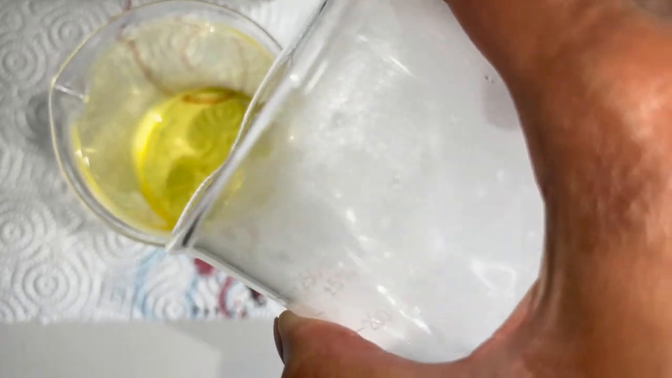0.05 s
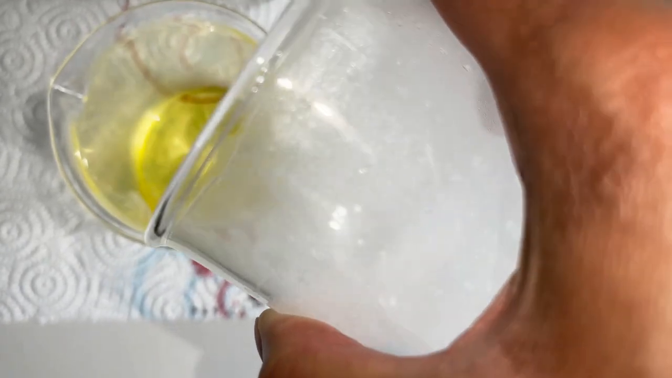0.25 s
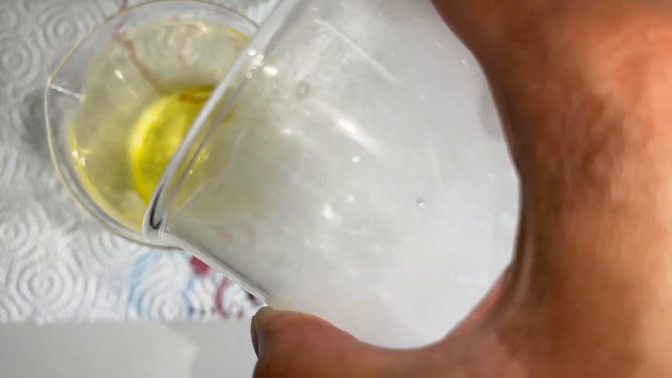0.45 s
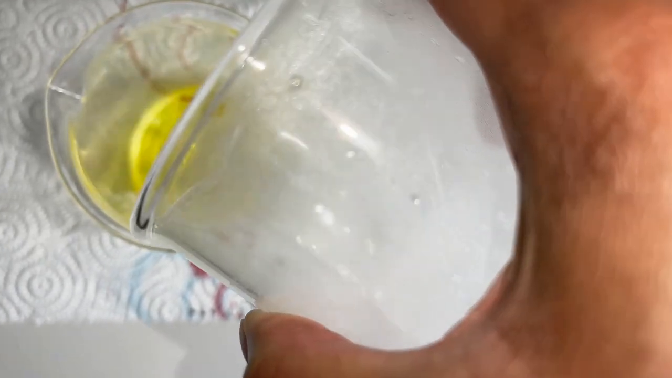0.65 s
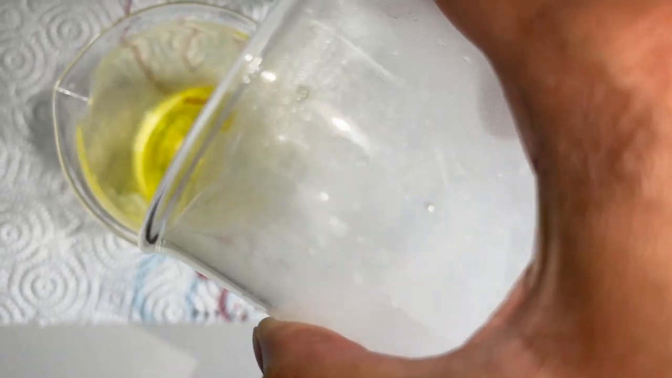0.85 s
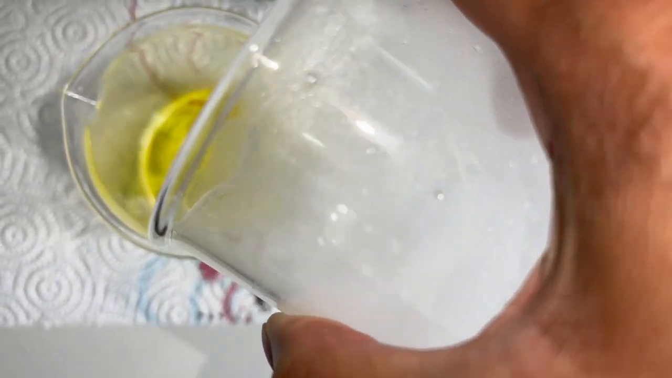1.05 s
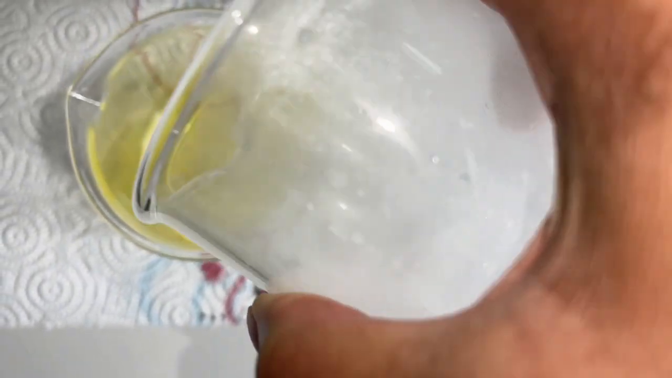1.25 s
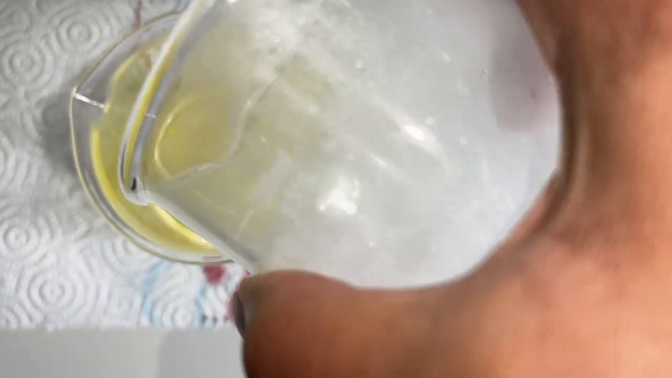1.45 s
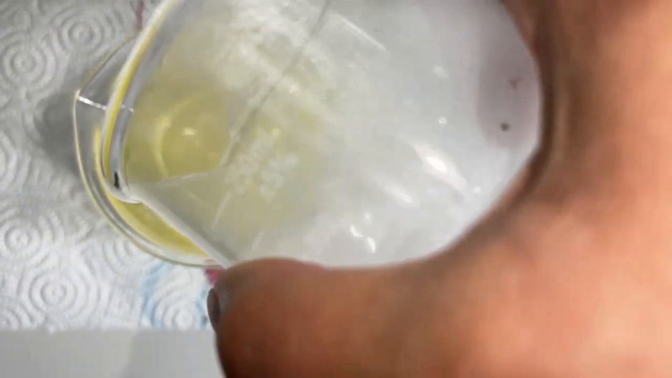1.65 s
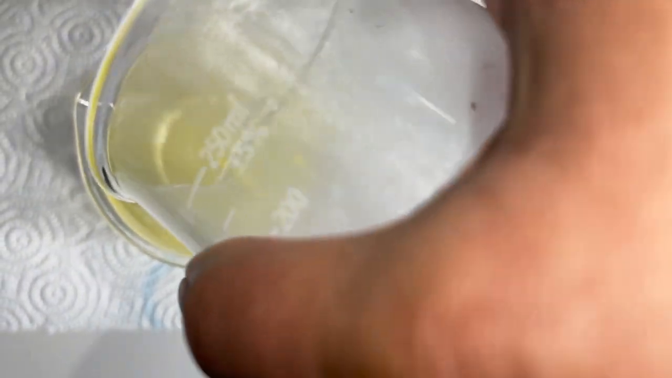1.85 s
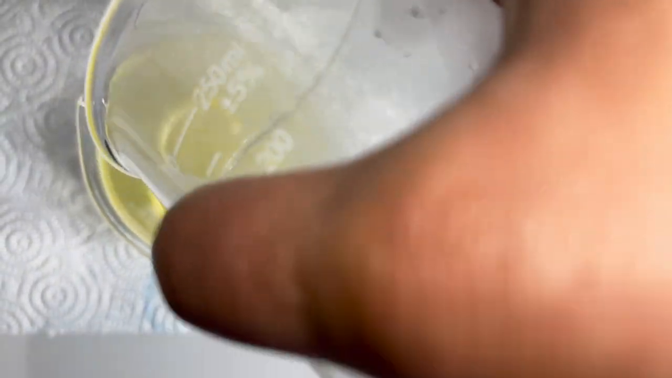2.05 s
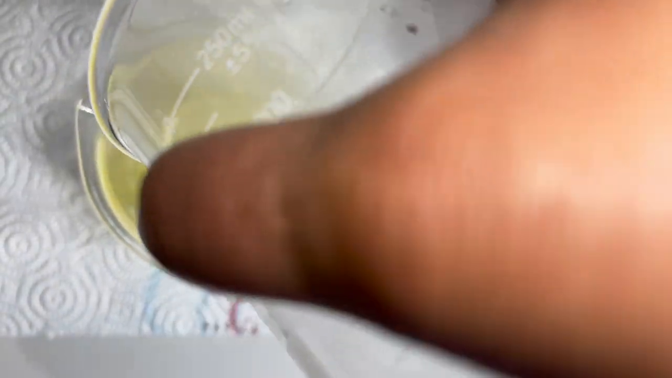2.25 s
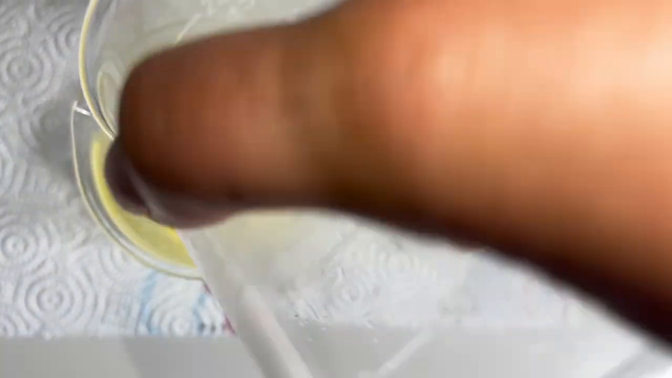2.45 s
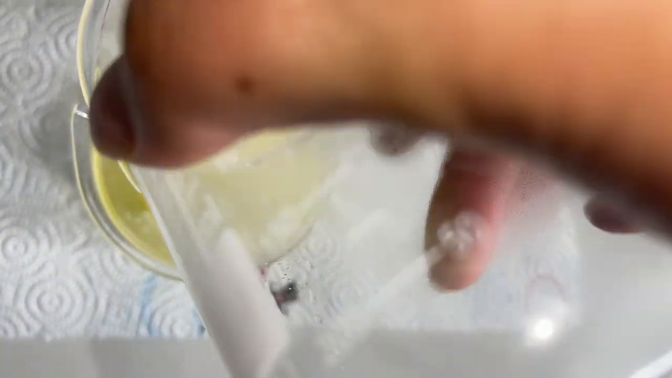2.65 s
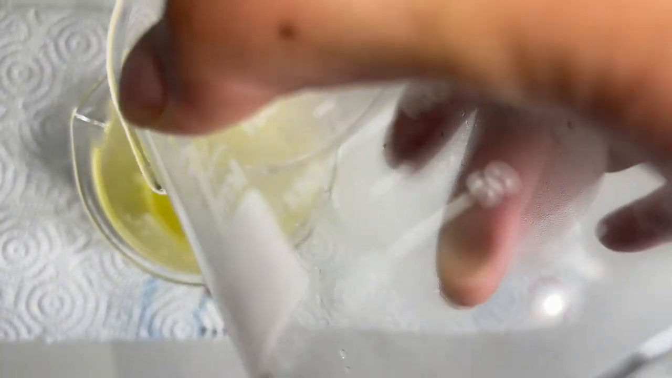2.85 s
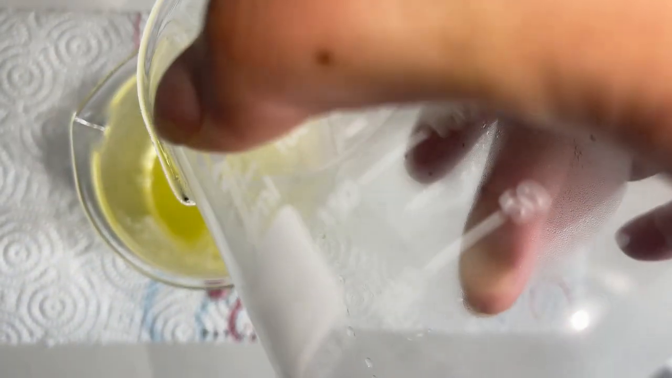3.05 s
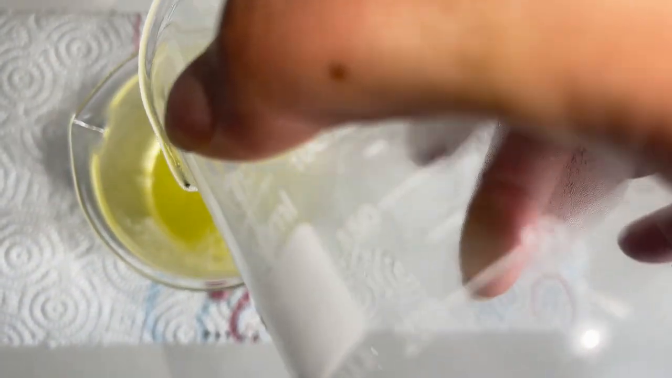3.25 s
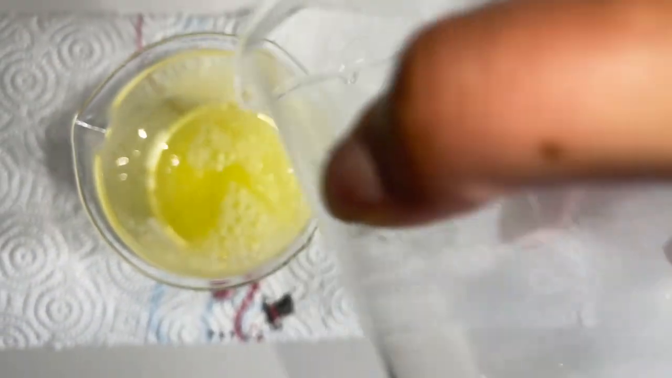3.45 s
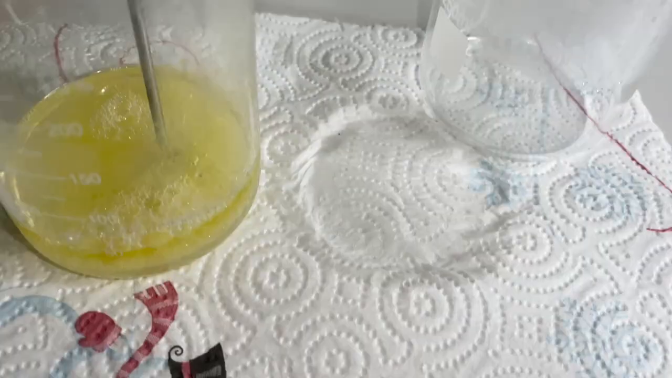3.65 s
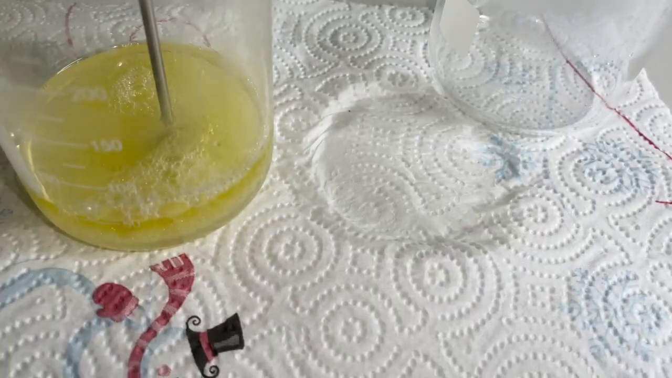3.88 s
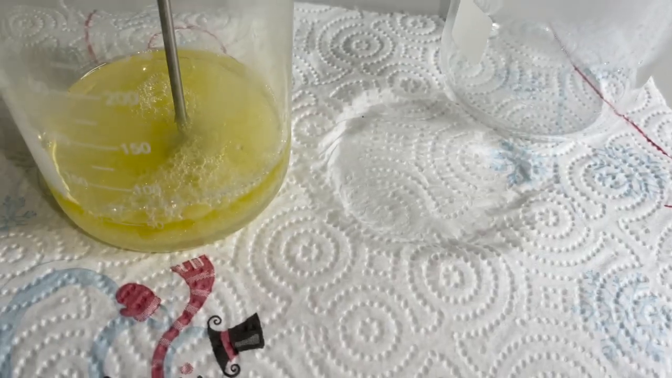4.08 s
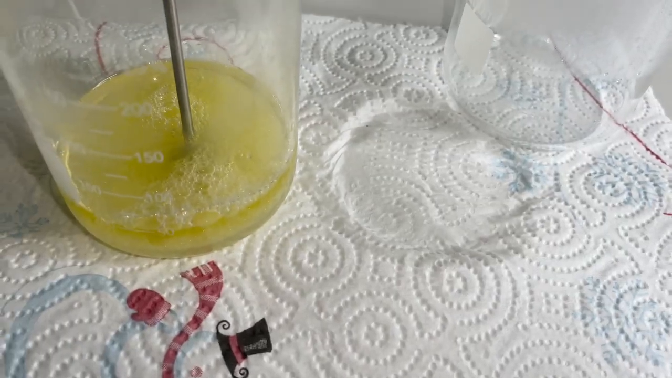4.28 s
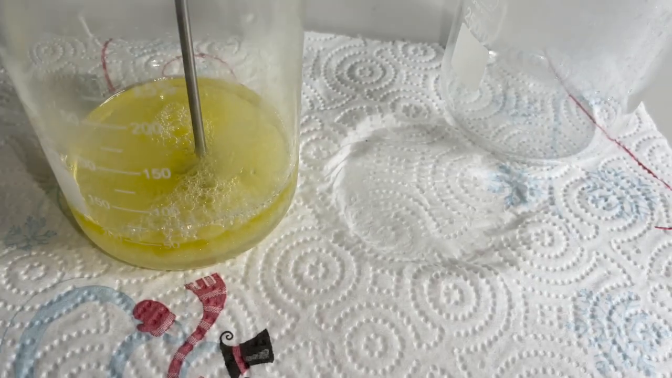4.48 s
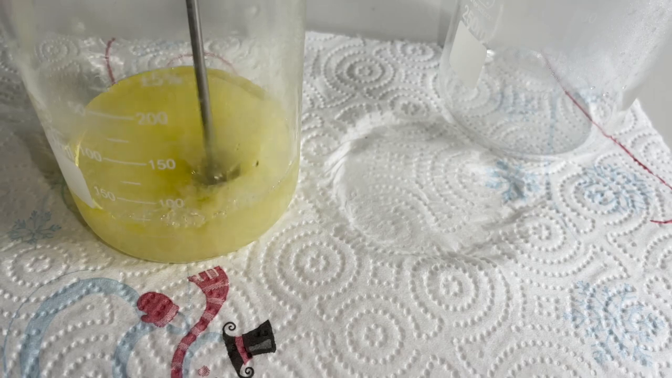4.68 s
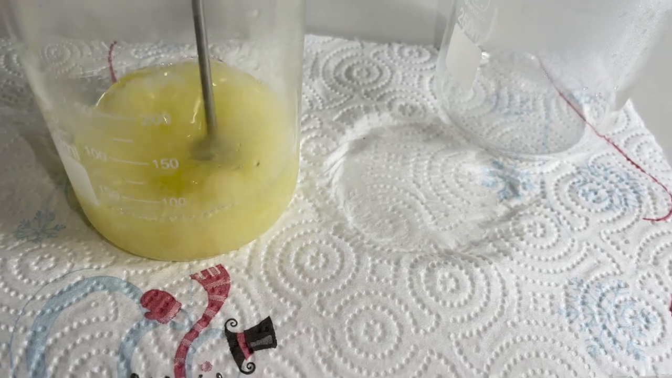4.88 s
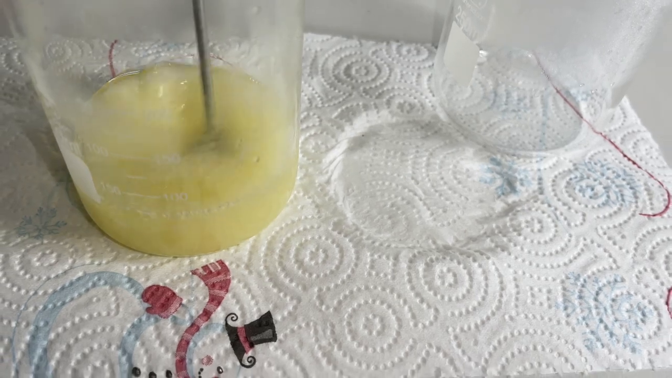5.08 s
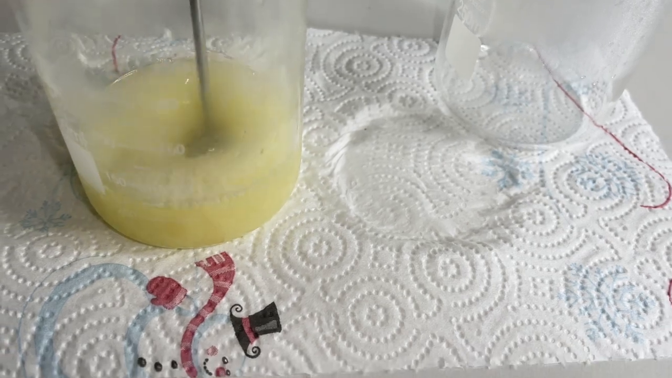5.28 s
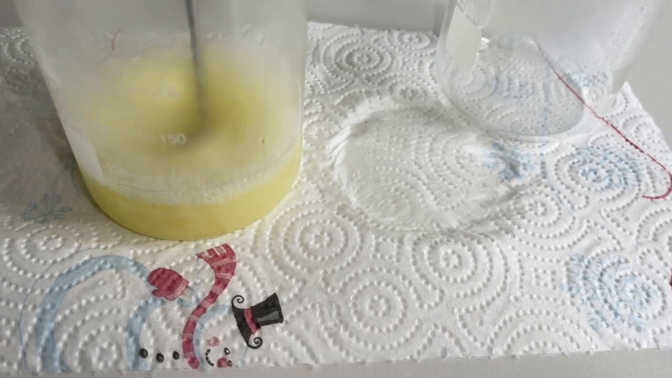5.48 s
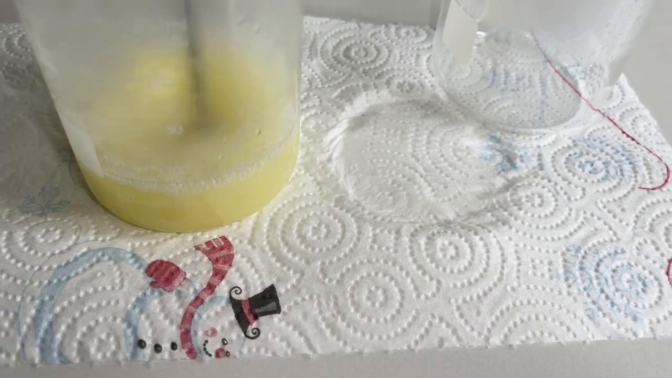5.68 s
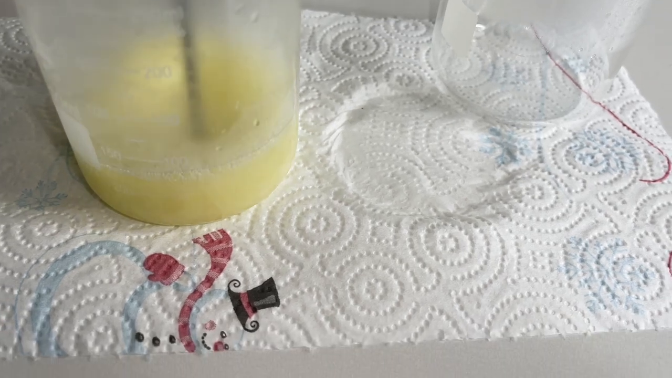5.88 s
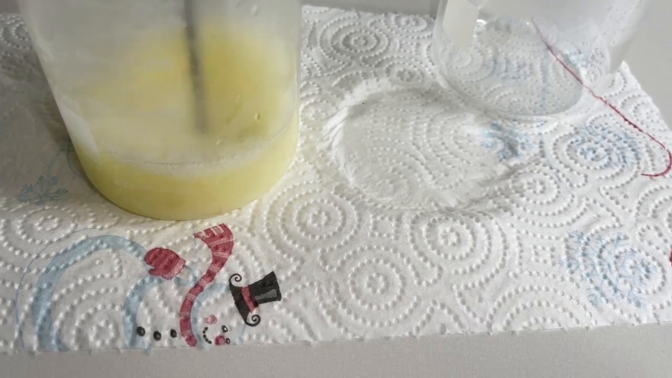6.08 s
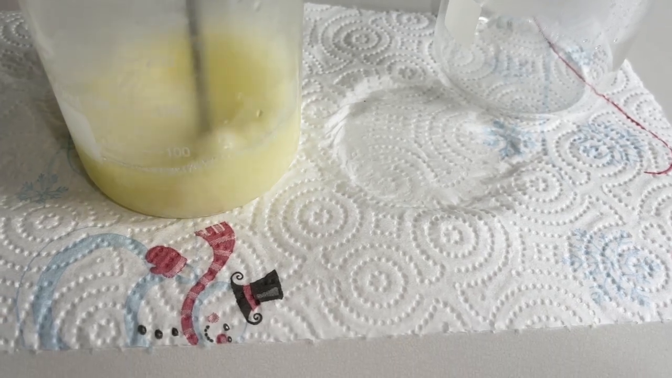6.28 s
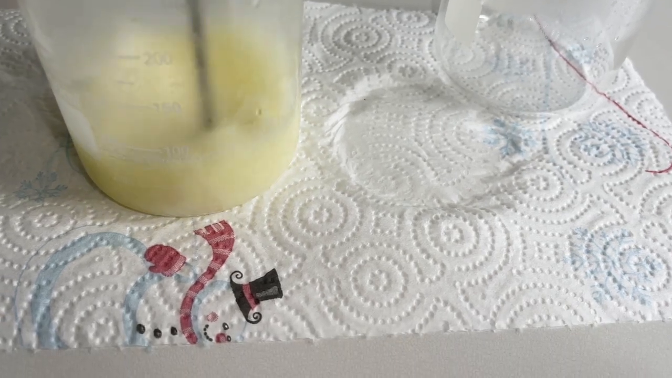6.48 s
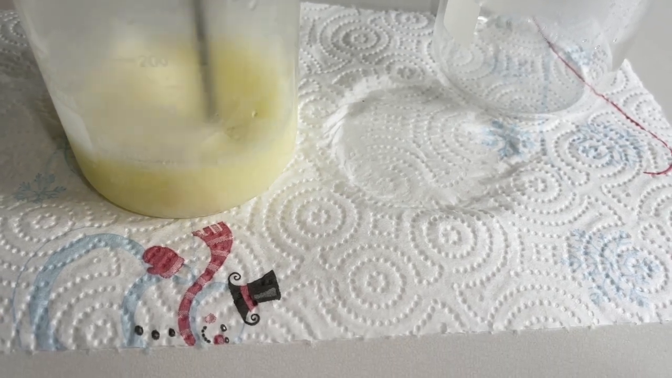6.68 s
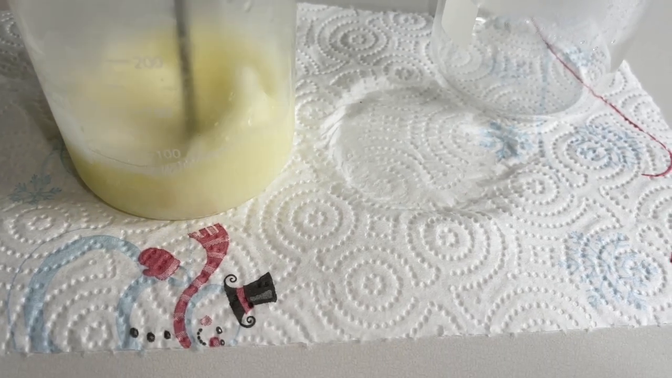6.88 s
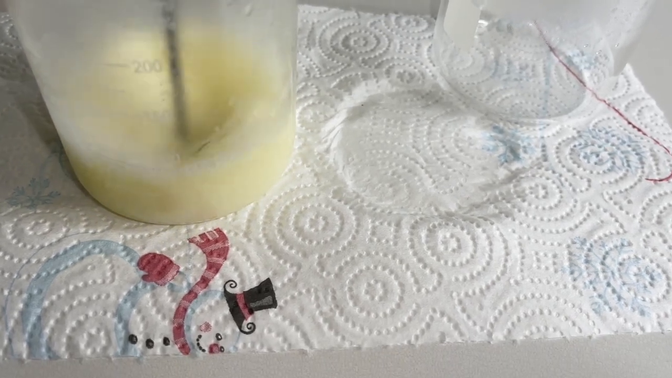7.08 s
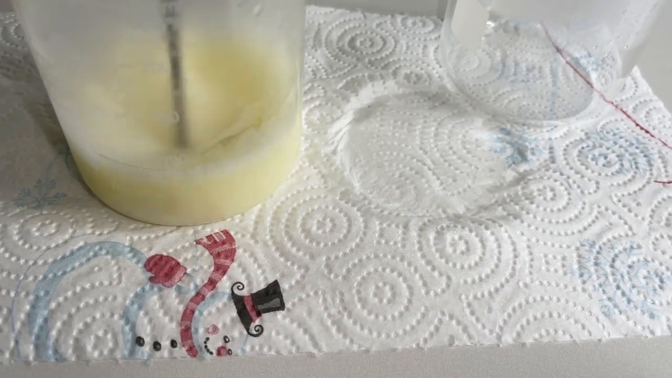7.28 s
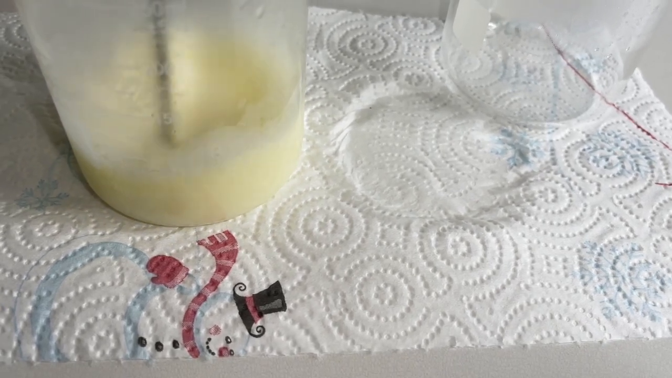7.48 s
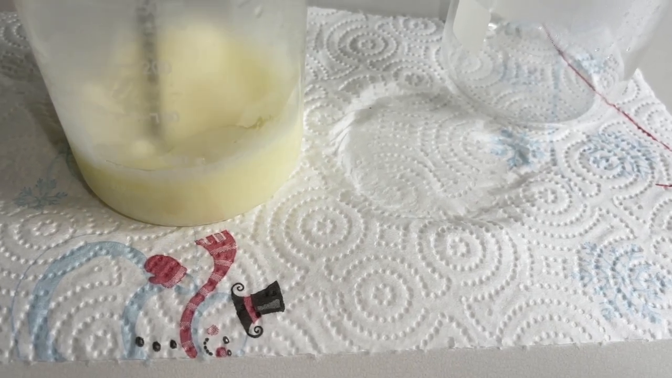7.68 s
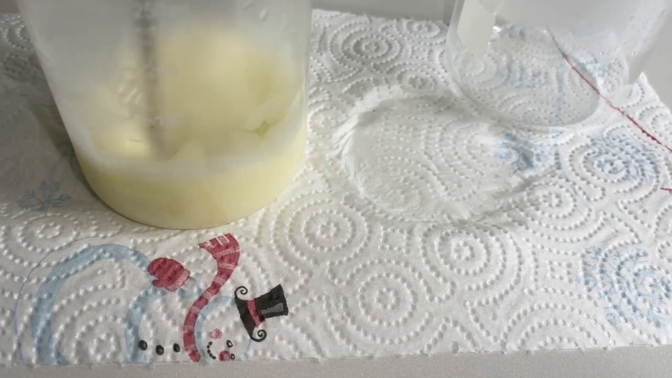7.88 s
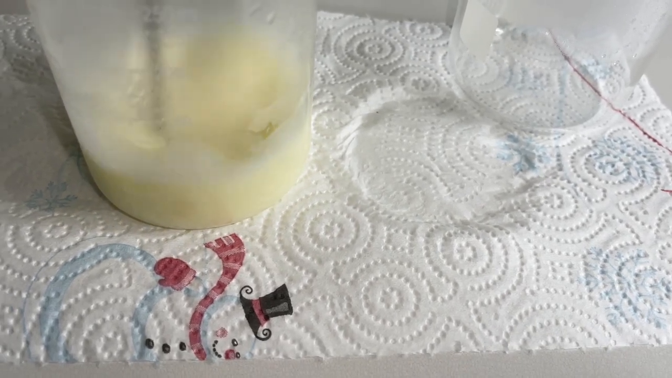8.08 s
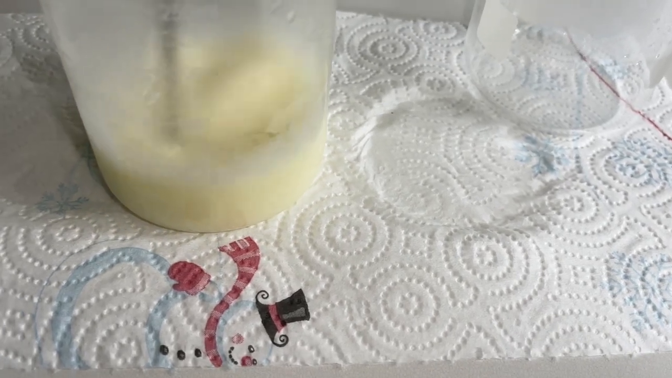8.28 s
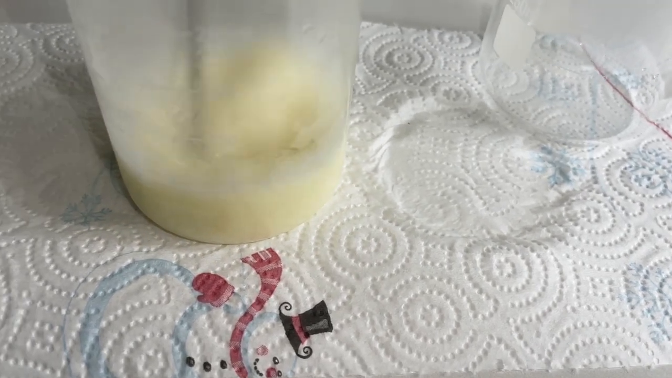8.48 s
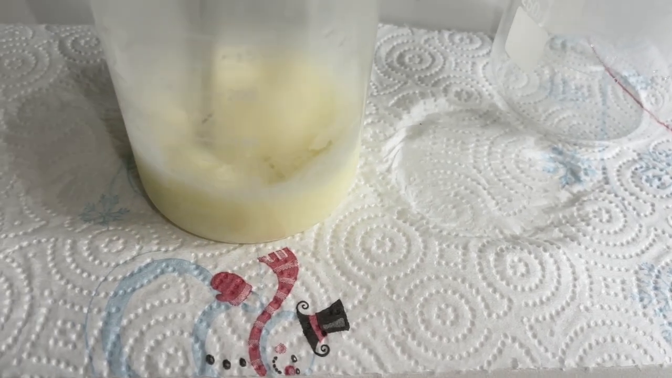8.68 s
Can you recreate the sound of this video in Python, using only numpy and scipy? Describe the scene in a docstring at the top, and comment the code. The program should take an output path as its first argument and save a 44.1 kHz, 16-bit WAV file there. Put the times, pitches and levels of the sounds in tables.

```python
"""On a table top, close to two microphone ports, liquid is poured from one beaker into another: drops crackle
and bubbles glug as decaying tones, over grains of splash ringing in the glass. The rims clink as the pour ends.
Soft low bumps and a few taps (sines, noise bursts) follow; then a small handheld mixer starts. Its unbalanced
shaft hums in harmonics, knocks and rubs on every turn; the blade churns the thickening liquid and twice clatters
against the beaker, whose damped modes ring. Low rumble and faint room air lie under it all."""
import sys
import numpy as np
from scipy import signal
from scipy.fft import rfft, irfft
from scipy.io import wavfile
from scipy.ndimage import map_coordinates

SR = 44100
rng = np.random.default_rng(int(sys.argv[2]) if len(sys.argv) > 2 else 0)


def to_wav(s):
    """Save 16-bit WAV."""
    ch = np.atleast_2d(s).T  # columns
    pcm = np.round(np.clip(ch, -1, 1) * 32767)  # PCM
    wavfile.write(sys.argv[1], SR, pcm.astype(np.int16))


N = 385434
TIME = np.arange(N) / SR

# the blade hits the beaker: (time [s], level [dB], brightness [Hz])
BLADE_HITS = [(6.6141, -11, 4980), (6.6197, -14, 4010), (6.6262, -13.5, 2500), (6.633, -10, 7020),
              (6.6373, -9.5, 7000), (6.661, -15, 3020), (7.2369, -11.5, 9000), (7.2383, -5.5, 4500),
              (7.255, -15, 2000), (7.2613, -8.5, 4500), (7.2751, -14.5, 900), (7.2855, -14.5, 800)]
MOTOR_ON_S, LOADED_S, KNOCKS_FROM_S, MOTOR_ATTACK_S = 4.617, 4.66, 4.8, 0.017
POUR_START_S = .49
RUB_FOLLOWS = 0.33   # dB more rubbing per dB of harder knocking


def from_db(db):
    """Decibels to gain."""
    return 10 ** (np.asarray(db) / 20)


def rms_one(x):
    """Scale to unit rms."""
    return x / np.sqrt(np.mean(x ** 2) + 1e-20)


def in_time(rows):
    """The second column of a curve, read at every sample."""
    s, value = np.transpose(rows)
    return np.interp(TIME, s, value)


def during(start, end, attack_s, release_s):
    """A gate that opens, holds and closes along straight ramps."""
    return np.clip(np.minimum((TIME - start) / attack_s, (end - TIME) / release_s), 0, 1)


def rise(start, attack_s):
    """A ramp from 0 to 1 that stays open."""
    return np.clip((TIME - start) / attack_s, 0, 1)


def swell(s, length_s, db):
    """A smooth rise and fall around a moment, in dB."""
    return db * np.exp(-np.minimum(((TIME - s) / length_s) ** 2, 20))


def fading(s, db, fade_db_per_s, attack_s):
    """An envelope that sets in at a level and fades evenly in dB; a negative fade grows."""
    return rise(s, attack_s) * from_db(db - np.minimum(fade_db_per_s * np.maximum(TIME - s, 0), 200))


def drift(rate):
    """Smooth chance with spread about 1, a new value rate times a second."""
    knots = rng.standard_normal(N // 20)
    return 1.2 * np.interp(TIME * rate, np.arange(len(knots)), knots)


def per_bin(points):
    """A table over log frequency, read at every FFT bin."""
    hz, value = np.transpose(points)
    bin_hz = np.arange(N // 2 + 1) * SR / N
    return np.interp(np.log(bin_hz + 1), np.log(hz), value)


def coloured(x, spectrum):
    """Give a signal a spectrum; rms 1."""
    return rms_one(irfft(rfft(x) * from_db(per_bin(spectrum)), N))


def lowpass(x, hz, order=2):
    """Butterworth low-pass."""
    return signal.sosfilt(signal.butter(order, min(hz, .45 * SR), fs=SR, output="sos"), x)


def resonate(x, hz, width):
    """A two-pole resonance with gain 1 on top."""
    r = np.exp(-np.pi * width / SR)
    poles = [1, -2 * r * np.cos(2 * np.pi * hz / SR), r * r]
    return signal.lfilter(np.array([1, 0, -1]) * (1 - r * r) / 2, poles, x + 1e-18)


def gliding(x, hz, width):
    """A resonance whose centre moves; gain 1 on top."""
    r, spin = np.exp(-np.pi * width / SR), np.exp(2j * np.pi * np.cumsum(hz) / SR)
    return 2 * np.real(spin * signal.lfilter([1 - r], [1, -r], x * np.conj(spin)))


def add(out, s, sound):
    """Mix a sound in at a time."""
    at = int(s * SR)
    out[at:at + len(sound)] += sound[:N - at]


def room(x, early_db, tail_db):
    """Table and walls: a few quick reflections and a dull tail, different at each port."""
    t60_s = 0.27
    t = TIME[:SR // 2]
    early = rng.standard_normal((2, len(t))) * (rng.random((2, len(t))) < .03)
    early = early * np.exp(-t / 0.0093) * (t > .001)
    tail = lowpass(rng.standard_normal((2, len(t))), 5600, order=1) * from_db(-60 * t / t60_s) * (t > .006)
    echoes = (from_db(early_db) * rms_one(early) + from_db(tail_db) * rms_one(tail)) / np.sqrt(len(t))
    return signal.fftconvolve(x[None], echoes, axes=1)[:, :N]


def at_ports(x, pan):
    """A near source reaches the two ports with unequal level and phase; their mean is the source."""
    # phase between the ports: (frequency [Hz], left ahead of right [rad])
    left_lead = [(100, 0.31), (800, 0.009), (3500, -0.89), (11000, -1.67), (14500, -.8)]
    ratio = from_db(per_bin(pan)) * np.exp(1j * np.clip(per_bin(left_lead), -2, 2))
    return irfft(rfft(x) * 2 * np.array([ratio, np.ones_like(ratio)]) / (1 + ratio), N)


def ringing(s, db, modes):
    """Glass struck once: its modes die away, each at its own rate."""
    age = np.maximum(TIME - s, 0)
    return sum(from_db(db + mode_db - 60 * np.minimum(age / t60, 2)) * np.sin(2 * np.pi * hz * age)
               for hz, t60, mode_db in modes)


def burst(s, db, decay_s, colour, bright_hz):
    """A short dying burst of noise with a given peak level."""
    age = np.maximum(TIME - s, 0)
    noise = rng.standard_normal(N) * (age > 0) * np.exp(-np.minimum(age / decay_s, 20))
    sound = lowpass(coloured(noise, colour), bright_hz)
    return from_db(db) * sound / np.abs(sound).max()


def grains(per_s, low_hz, high_hz, cycles, spread_db, count=16):
    """Random tiny bubbles, each ringing some cycles at one of a set of pitches; rms 1."""
    born = rng.random(N) < per_s / SR
    sizes = born * from_db(spread_db * np.minimum(rng.exponential(1, N), 3)) * rng.choice([-1, 1], N)
    dealt = rng.integers(0, count, N)
    pitches = np.geomspace(low_hz, high_hz, count)
    return rms_one(sum(rms_one(resonate(sizes * (dealt == k), hz, hz / cycles))
                       for k, hz in enumerate(pitches)))


def bubbles(rows, swell_cycles, glide, snap_db, snap_s):
    """A bubble pinches off with a snap, swells for a few cycles and dies away, rising in pitch."""
    out, t = np.zeros(N), TIME[:SR // 20]
    for s, db, hz in rows:
        age = hz * t / (swell_cycles * from_db(rng.normal(0, 1)))
        pitch_rise = 1 + glide * (np.tanh(age / 2) - .5)
        tone = age ** 2 * np.exp(2 - 2 * age) * np.sin(2 * np.pi * hz * t * pitch_rise)
        snap = lowpass(rng.standard_normal(len(t)) * np.exp(-t / snap_s), min(3 * hz, 11000), order=4)
        snap = snap - lowpass(snap, hz / 4, order=1)   # small bubbles carry little bass
        add(out, s, from_db(db) * (tone + from_db(snap_db) * snap))
    return out


def pour_flow():
    """The stream sets in quickly, runs evenly and thins out to nothing."""
    return during(POUR_START_S, 2.292, attack_s=0.12, release_s=0.23)


def background():
    """Low rumble from the hands and the pouring, and the faint air of the room."""
    # shifts of the grip start a rumble: (time [s], level [dB], fade [dB/s]); the first slowly grows
    grips = [(0, -66.5, -1), (2.56, -54, 25), (3.685, -62, 13), (4.66, -53, 2)]
    # low rumble: (frequency [Hz], level [dB])
    rumble_colour = [(18, -36), (58, 2.5), (105, -5), (170, -15), (270, -15), (430, -28.5), (900, -55.5)]
    # room air: (frequency [Hz], level [dB])
    air_colour = [(450, -3.5), (1000, -13.5), (2700, -10), (3800, -14.5), (4600, -23.5), (9000, -18.5),
                  (14000, -27.5)]
    still_db, pour_db, air_db = -75, -67, -74
    handling = sum(fading(*grip, attack_s=0.012) ** 2 for grip in grips)
    level = np.sqrt(from_db(still_db) ** 2 + (from_db(pour_db) * pour_flow()) ** 2 + handling)
    middle, side = [coloured(rng.standard_normal(N), rumble_colour) for _ in range(2)]
    air = np.array([coloured(rng.standard_normal(N), air_colour) for _ in range(2)])
    return level * (middle + .22 * side * np.array([[1], [-1]])) + from_db(air_db) * air


def bumps():
    """Soft low thumps of the handled beaker: dying sines with a softened start."""
    # bumps: (time [s], level [dB])
    bump_rows = [(2.58, -35), (3.679, -51.5)]
    hz, t60_s = 56.1, 0.37
    out = 0
    for s, db in bump_rows:
        age = np.maximum(TIME - s, 0)
        envelope = from_db(db - 60 * np.minimum(age / t60_s, 2)) * np.minimum(age * hz / 2, 1)
        out = out + envelope * np.sin(2 * np.pi * hz * age)
    return out


def taps():
    """Short knocks of handled things wake the room; the hardest sets a beaker ringing."""
    # light taps: (time [s], peak level [dB], brightness [Hz], room share [gain])
    tap_rows = [(3.7497, -34.5, 7000, 0.63), (3.7533, -34, 4500, 0.66), (4.148, -50.5, 2000, 0.06)]
    # noise of a tap: (frequency [Hz], level [dB])
    tap_colour = [(120, -28), (300, -22), (1000, -4.5), (1450, -8), (1800, -20.5), (3200, -11), (4500, -22),
                  (14000, -28)]
    # modes of the tapped beaker: (frequency [Hz], t60 [s], level [dB])
    tap_modes = [(415, 0.21, 1.5), (1100, 0.27, 0), (1420, .26, -6)]
    out = 0
    for s, db, bright_hz, wet in tap_rows:
        tap = burst(s, db, 0.0019, tap_colour, bright_hz)
        out = out + tap + wet * room(tap, early_db=6.0, tail_db=2)
    s, db = max(tap_rows, key=lambda row: row[1])[:2]
    return out + ringing(s, db - 18.5, tap_modes)


def clink():
    """As the pour ends the two rims touch: a thin tick and a faint long ring."""
    # noise of the tick: (frequency [Hz], level [dB])
    tick_colour = [(500, -19), (1200, -8), (1650, 1), (3200, -5), (5000, -16)]
    # modes of the glass rim: (frequency [Hz], t60 [s], level [dB])
    rim_modes = [(1351, .7, -15), (2062, .25, -7)]
    s, db, ring_db = 2.297, -32.5, -27
    sound = burst(s, db, 0.0012, tick_colour, 5300) + ringing(s, db + ring_db, rim_modes)
    return sound + room(sound, early_db=-3.0, tail_db=-16)


def in_beaker(x):
    """A splash heard directly and through the ringing air of the beaker."""
    # resonances of the air in the beaker: (frequency [Hz], level [dB])
    cavity = [(900, -2.5), (1310, 2), (1580, -2.5), (2220, -0.5), (2600, 2), (3370, -0.5), (4200, -3.5)]
    width_hz, direct_db = 130, -14.5
    ring = sum((-1) ** k * from_db(db) * resonate(x, hz, width_hz) for k, (hz, db) in enumerate(cavity))
    return from_db(direct_db) * lowpass(x, 4500) + ring


def slaps(rows, decay_s):
    """Short wet slaps inside the beaker, each with a given peak level."""
    out, t = np.zeros(N), TIME[:SR // 20]
    for s, db in rows:
        sound = in_beaker(rng.standard_normal(len(t)) * np.exp(-t / decay_s))
        add(out, s, from_db(db) * sound / np.abs(sound).max())
    return out


def patter(per_s, spread_db):
    """Random impacts of uneven size; rms 1."""
    born = rng.random(N) < per_s / SR
    return rms_one(born * from_db(spread_db * np.minimum(rng.exponential(1, N), 2)) * rng.choice([-1, 1], N))


def glugging(rows):
    """Big bubbles: the louder, the lower they ring, and the pitch climbs as the beaker fills."""
    mean_hz, rise_hz_per_s, fall_hz_per_db, scatter_hz = 831, 27, 5, 32.25
    usual_s, usual_db = np.mean(rows, axis=0)
    pitched = []
    for s, db in rows:
        hz = mean_hz + rise_hz_per_s * (s - usual_s) - fall_hz_per_db * (db - usual_db)
        pitched.append((s, db, hz + rng.normal(0, scatter_hz)))
    rings = bubbles(pitched, swell_cycles=2.5, glide=0.029, snap_db=-8.5, snap_s=0.0028)
    return resonate(rings, 799, 450)   # heard through the deepest resonance of the beaker's air


def pour():
    """Glugs near the beaker's air resonance, over a patter of splashes and fine spray."""
    # large bubbles: (time [s], level [dB])
    glug_rows = [(0.677, -27), (0.908, -32), (0.975, -35.5), (1.045, -23.5), (1.086, -22), (1.103, -17.5),
                 (1.123, -21), (1.139, -14), (1.178, -19), (1.286, -28), (1.308, -26.5), (1.332, -26),
                 (1.406, -17.5), (1.434, -17), (1.449, -18), (1.484, -24), (1.565, -31.5), (1.695, -31),
                 (1.725, -22.5), (1.752, -25.5), (1.794, -23), (1.88, -29), (1.907, -30.5), (1.997, -26.5),
                 (2.012, -22), (2.044, -22.5), (2.073, -17.5), (2.087, -18), (2.096, -22.5), (2.109, -23.5),
                 (2.141, -23), (2.214, -37.5)]
    # drops and small bubbles: (time [s], level before a 4.5 dB cut [dB], pitch [Hz])
    drop_rows = [(0.528, -22, 10300), (0.666, -19.5, 8230), (0.7466, -14.5, 3400), (0.810, -23, 11000),
                 (0.863, -21, 6500), (0.948, -18.5, 1330), (1.0627, -22.5, 8400), (1.2204, -20, 2640),
                 (1.289, -23, 2080), (1.4282, -22, 4240), (1.6203, -20, 9230), (1.6617, -21, 8850),
                 (2.33, -38, 4360), (2.3771, -39.5, 10920), (4.216, -49.5, 9100)]
    # the stream breaks up and slaps the surface: (time [s], peak level [dB])
    splat_rows = [(1.228, -23.5), (1.245, -30), (1.264, -27), (1.288, -28), (1.427, -31), (2.2, -40)]
    # fine spray: (frequency [Hz], level [dB])
    spray_colour = [(3500, -24.5), (7000, -6), (9100, 10.5), (10200, -6.5), (11400, 17), (12500, -18)]
    # balance of the pour at the ports: (frequency [Hz], left over right [dB])
    pour_pan = [(800, -2), (10000, -0.28)]
    poured_s = np.maximum(TIME - POUR_START_S, 0)
    # small bubbles gurgle all along and swarm, with splashes, in the wake of each glug
    wake_s = 0.095   # time to fall to 1/e
    wake_fade = 20 / np.log(10) / wake_s
    wake = np.sqrt(sum(fading(s, db, wake_fade, 0.0065) ** 2 for s, db in glug_rows))
    gurgle = (from_db(-52) + from_db(-25.5) * wake) * grains(170, 760, 980, cycles=12, spread_db=6.5)
    # splashing softens as the liquid deepens: fades in dB per second
    splash_fade, spray_fade = 3.5, 4
    splash_level = from_db(-47.5 - splash_fade * poured_s) + from_db(-47.5) * wake
    splash = splash_level * rms_one(in_beaker(grains(300, 1204, 4450, cycles=20, spread_db=10.5)))
    # a dense wet patter under the splashes
    wash = from_db(-53.5 - splash_fade * poured_s) * rms_one(in_beaker(patter(110, spread_db=9.5)))
    mist = grains(260, 4000, 12870, cycles=17, spread_db=6.0)
    spray = from_db(-47.5 - spray_fade * poured_s) * coloured(mist, spray_colour)
    # the surface heaves under the stream
    plop = from_db(-62.5) * grains(250, 95, 330, cycles=8.3, spread_db=5.5)
    # each glug also snaps
    splats = slaps(splat_rows, decay_s=0.0061) + from_db(-17.5) * slaps(glug_rows, decay_s=0.0011)
    drops = from_db(-4.5) * bubbles(drop_rows, swell_cycles=2.1, glide=0.041, snap_db=-8.0, snap_s=0.0032)
    stream = pour_flow() * (gurgle + splash + spray + wash + plop)
    liquid = lowpass(stream + splats + glugging(glug_rows) + drops, 12500, order=8)
    return at_ports(liquid, pour_pan) + room(liquid, early_db=-11, tail_db=-15)


def strikes():
    """Each blade hit cracks and rings the damped modes of the filled beaker."""
    # modes of the filled beaker, before scatter: (frequency [Hz], t60 [s], level [dB])
    beaker_modes = [(161, 0.035, -11.5), (275, 0.014, -10), (413, 0.0084, -4), (526, 0.027, 0),
                    (732.5, 0.11, -8), (900, 0.047, -6.5), (1530, 0.019, -7), (1940, 0.013, -1),
                    (3450, 0.014, 2.5), (7530, 0.0018, 14)]
    out, t = np.zeros(N), TIME[:SR // 10]
    hz, t60, mode_db = np.transpose(beaker_modes)[:, :, None]
    for s, db, bright_hz in BLADE_HITS:
        strength = from_db(mode_db + rng.normal(0, 1.43, hz.shape)) * rng.choice([-1, 1], hz.shape)
        tones = np.sin(2 * np.pi * hz * rng.normal(1, 0.061, hz.shape) * t)
        ring = np.sum(strength * from_db(-60 * t / t60) * tones, axis=0)
        crack = 0.75 * rng.standard_normal(len(t)) * np.exp(-t / 0.0045)
        hit = lowpass(ring + crack, bright_hz, order=1)
        add(out, s, from_db(db + 2.0) * hit / np.abs(hit).max())
    return out


def freedom(brake, recover_s):
    """Each hit on the wall brakes the blade for a moment: a gain of 1 running free, less when braked."""
    age = np.maximum(TIME - np.array(BLADE_HITS)[:, :1], 0) / recover_s
    return 1 / (1 + brake * np.sum(age ** 2 * np.exp(-np.minimum(age ** 2, 20)), axis=0))


def once_a_turn(turns, at, sharpness):
    """A smooth burst at one angle of the shaft; rms 1."""
    return rms_one(np.exp(sharpness * np.cos(2 * np.pi * (turns - at))))


def knocks(angle, thick):
    """One click a turn, less even in thick liquid; rms 1."""
    jitter_turns = .001 * (1 + thick) * drift(150)
    count = np.floor(angle + jitter_turns)
    return rms_one(np.diff(count, prepend=count[0]) * from_db((1 + thick) * drift(70)))


def housing(force, lean_db):
    """The housing's resonances climb a little as the shaft presses harder; rms 1."""
    # resonances at rest: (frequency [Hz], width [Hz], level [dB])
    shell_modes = [(1530, 149, 4.5), (1700, 200, 4), (1920, 316, -0.5), (2485, 220, -13), (3185, 168, 0),
                   (4080, 332, -4), (4830, 450, -16)]
    stretch = 1 + .006 * lean_db + .018 * drift(4)
    return rms_one(sum((-1) ** k * from_db(db) * gliding(force, hz * stretch, width)
                       for k, (hz, width, db) in enumerate(shell_modes)))


def bearing_friction(turns, size=400):
    """Rough spots pass on every turn and buzz, changing as the shaft slides; fresh friction adds treble hiss."""
    surface = rng.standard_normal((size, size))
    track = map_coordinates(surface, [TIME * 10, turns % 1 * size], order=1, mode="grid-wrap")
    fresh = rng.standard_normal(N)
    return .7 * rms_one(track) + fresh - lowpass(fresh, 4000, order=1)


def shaft_hum(turns, thick, slosh):
    """The unbalanced shaft hums at its turning rate and overtones, wavering in thick liquid."""
    # overtones: (multiple of the turning rate, level in thin liquid [dB], level in thick liquid [dB])
    overtones = [(1, 2, -1.5), (2, -20.5, -45), (3, -14, -15), (4, -13.5, -22.5), (5, -19.5, -16.5),
                 (6, -11.5, -20.5)]
    hum_db = -32.5 + thick * 2.5
    hum = 0
    for k, thin_db, thick_db in overtones:
        level_db = thin_db + thick * (thick_db - thin_db) + 0.78 * np.log(k) * drift(14)
        level = from_db(hum_db + level_db + 1.1 * slosh)
        hum = hum + level * np.sqrt(2) * np.cos(2 * np.pi * k * turns)
    return hum


def rattling(angle, lead, thick, knock_db, lean_db):
    """On every turn a bright gritty scrape, then a duller knock, both through the housing."""
    grit = once_a_turn(angle + lead, 0, 9.2) * rng.standard_normal(N)
    scrape = np.diff(knocks(angle + lead, thick) + .12 * grit, 2, prepend=[0, 0])
    scrape_db = -39.5 + RUB_FOLLOWS * np.maximum(lean_db, 0)
    knock = from_db(knock_db) * housing(lowpass(knocks(angle, thick), 2940), lean_db)
    return knock + from_db(scrape_db) * housing(scrape, lean_db)


def bearing_noise(rubbing, angle, thick, press_db):
    """The bearing rubs, and catches once a turn and rings high; hard pressing eases the squeak."""
    rub_db, squeak_db = -34 + thick * 0.5, -49.5 + thick * 12.5
    caught = rng.standard_normal(N) * once_a_turn(angle, -0.073, 1.7)
    squeak = rms_one(resonate(resonate(caught, 9600, 310), 9270, 360))
    return from_db(rub_db + RUB_FOLLOWS * press_db) * rubbing + from_db(squeak_db - press_db) * squeak


def spin_up(rubbing):
    """Before the shaft starts to knock, the motor sings in the housing: noise in narrow bands."""
    # singing bands: (frequency [Hz], level [dB])
    whirr_bands = [(1600, -1), (3300, -1), (4000, 2)]
    width_hz = 250
    singing = 0
    for hz, db in whirr_bands:
        band = resonate(resonate(rng.standard_normal(N), hz, width_hz), hz, width_hz)
        singing = singing + from_db(db) * band
    gate = during(MOTOR_ON_S, KNOCKS_FROM_S + MOTOR_ATTACK_S, MOTOR_ATTACK_S, MOTOR_ATTACK_S)
    return from_db(-42.5) * gate * (rms_one(singing) + 0.64 * rubbing)


def churning(speed):
    """The blade whips air into the liquid, as hard as the liquid drags it below its free speed."""
    # the blade bites into the liquid: (time [s], length [s], extra churning [dB])
    bites = [(4.897, 0.014, 2), (5.11, 0.15, 9)]
    # froth, before a tilt of +3 dB per octave: (frequency [Hz], level [dB])
    churn_colour = [(30, -48), (150, -15.5), (330, -16), (560, -5), (850, 2), (1080, -15), (1700, -3.5),
                    (3000, -4), (5000, -28)]
    free_turns_per_s, drag_turns_per_s, idle_db, drag_db = 99.13, 4.2, -48, 13
    drag = np.clip((free_turns_per_s - speed) / drag_turns_per_s, 0, 1)
    froth = lowpass(grains(1300, 159, 2570, cycles=1.42, spread_db=1.0), 1450)
    tilted = [(hz, db + 10 * np.log10(hz)) for hz, db in churn_colour]
    level = from_db(idle_db + drag_db * drag + sum(swell(*bite) for bite in bites))
    return rise(LOADED_S, attack_s=0.14) * level * coloured(froth, tilted)


def mixer():
    """Hum, knocks, rubbing and churning all follow the turning shaft."""
    # shaft speed, before sloshing: (time [s], speed [turns/s])
    shaft_speed = [(4.67, 73.2), (4.74, 93.2), (4.81, 94.6), (4.88, 89.6), (4.99, 100.1), (5.69, 99.0),
                   (5.79, 96.4), (6.32, 94.7), (6.35, 91.3), (6.49, 94.7), (6.73, 90.0), (6.87, 94.7),
                   (7.18, 95.6), (7.35, 85.2), (7.42, 90.9), (7.66, 91.7), (7.8, 89.8), (8.47, 92.5),
                   (8.61, 90.4), (8.7, 93.5)]
    # how hard the shaft knocks as the hand tilts it, before sloshing: (time [s], level [dB])
    knock_levels = [(4.8, -36), (5.7, -33.5), (5.9, -36), (6.0, -42), (6.55, -43.5), (6.7, -37.5),
                    (6.97, -37.5), (7.08, -32), (7.22, -34), (7.3, -40), (7.8, -38.5), (8.7, -37)]
    # the scrape comes a little before the knock: (time [s], lead [turns])
    scrape_leads = [(4.8, .05), (5.2, .3), (5.7, .27), (6.6, .05), (7.1, .17), (7.7, .37)]
    # rubbing: (frequency [Hz], level [dB])
    rub_colour = [(60, -33), (1100, -16), (1600, -5.5), (2400, -9), (2800, -15.5), (3300, -5),
                  (5500, -11.5), (7200, -12), (8100, -5.5), (9400, 0), (10300, -13), (11200, -3.5),
                  (13400, -29), (15300, -14), (16000, -36)]
    # air gulped as the blade bites: (time [s], level [dB], pitch [Hz])
    gulp_rows = [(4.712, -22, 920), (4.724, -20.5, 823), (4.752, -20, 850), (4.764, -24, 850),
                 (4.882, -27.5, 770)]
    # balance of the mixer at the ports: (frequency [Hz], left over right [dB])
    mixer_pan = [(100, -2.5), (480, -7), (950, -2.5), (1800, -7), (3800, -7), (8000, 0)]
    speed, knock_db, lead = in_time(shaft_speed), in_time(knock_levels), in_time(scrape_leads)
    thick = np.interp(TIME, (5.5, 6.4), [0, 1])   # the liquid thickens
    slosh = thick * drift(11)   # thick liquid sloshes: the shaft speeds up and knocks as it comes free
    lean_db = knock_db - np.median(knock_db) + slosh
    press_db = np.maximum(lean_db, 0)
    turns = np.cumsum(speed * (1 + .006 * slosh + .002 * thick * drift(20))) / SR
    angle = turns - .3   # the knock falls at this part of a turn
    contact = rms_one(1 + .3 * once_a_turn(angle + lead, .1, 3))
    rubbing = coloured(bearing_friction(turns) * contact, rub_colour)
    rattle = rise(KNOCKS_FROM_S, MOTOR_ATTACK_S) * rattling(angle, lead, thick, knock_db + slosh, lean_db)
    bearing = rise(LOADED_S, MOTOR_ATTACK_S) * bearing_noise(rubbing, angle, thick, press_db)
    gulps = bubbles(gulp_rows, swell_cycles=2.4, glide=.05, snap_db=-4, snap_s=.003)
    free = freedom(brake=2.6, recover_s=0.033)
    running = spin_up(rubbing) + rattle + bearing + churning(speed)
    whirr = np.sqrt(free) * running + gulps + strikes()
    hum = rise(MOTOR_ON_S, attack_s=0.45) * free * shaft_hum(turns, thick, slosh)
    return at_ports(whirr + hum, mixer_pan) + room(whirr, early_db=-9, tail_db=-12)


def scene():
    """Everything on the table top."""
    return background() + bumps() + taps() + clink() + pour() + mixer()


def record(dry):
    """The deepest bass is rolled off and the top is cut steeply."""
    low_cut_hz, cutoff_hz = 30, 16000
    dry = signal.sosfilt(signal.butter(4, low_cut_hz, "high", fs=SR, output="sos"), dry)
    return signal.sosfilt(signal.ellip(10, .2, 80, cutoff_hz, fs=SR, output="sos"), dry)


dry = scene()
out = record(dry)
to_wav(out)
```